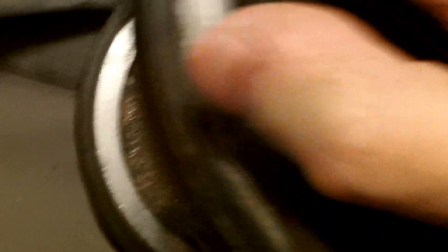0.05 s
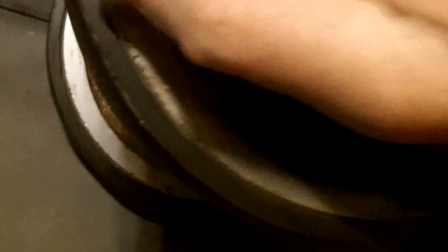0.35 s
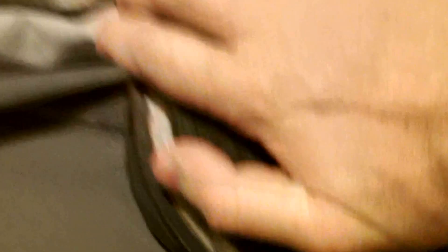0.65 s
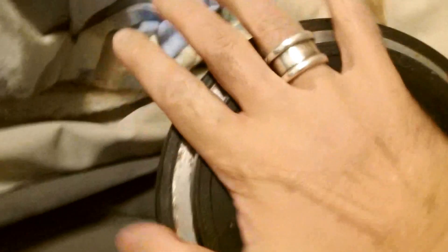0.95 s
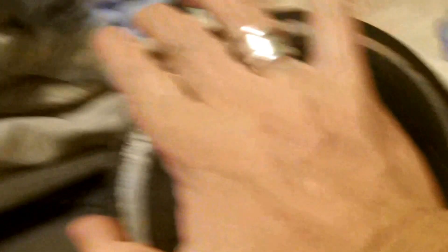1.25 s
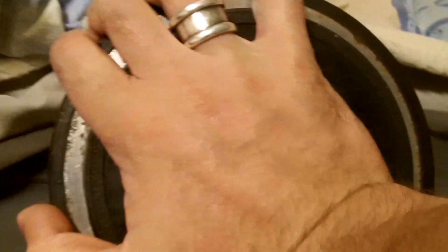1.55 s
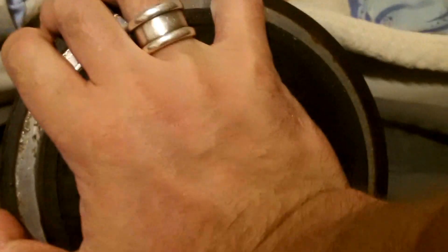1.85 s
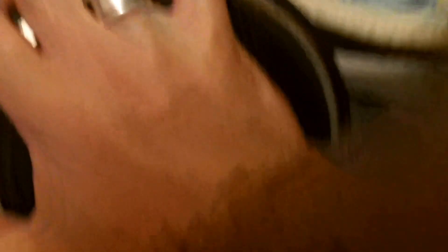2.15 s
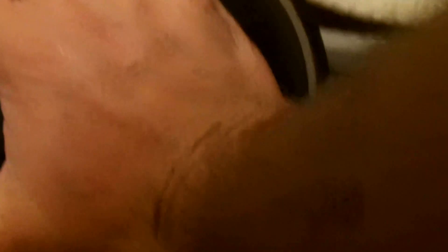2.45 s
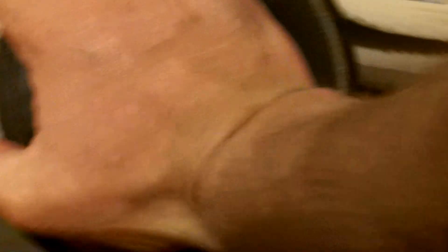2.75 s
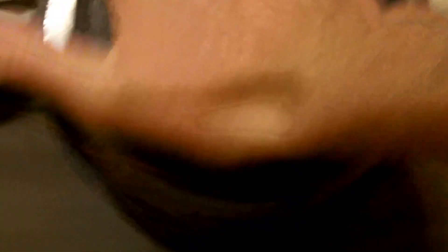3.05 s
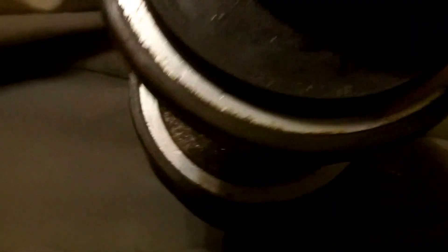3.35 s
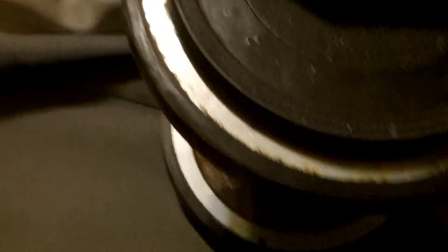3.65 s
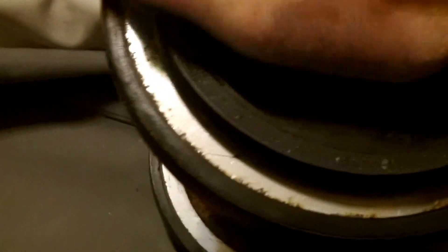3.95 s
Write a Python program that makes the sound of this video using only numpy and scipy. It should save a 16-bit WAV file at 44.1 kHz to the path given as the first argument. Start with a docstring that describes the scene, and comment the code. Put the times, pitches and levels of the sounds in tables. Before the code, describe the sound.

A mattress cover rustles twice under a dumbbell pressed by hand, then more faintly. The metal plates tick and give one sharp click midway, while skin squeaks briefly, all close and dry over handling rumble and indoor hiss.

```python
"""Two broad rubs over a mattress cover, close up, as a hand turns and presses a plate dumbbell on it.
The cloth rustles as its fibres catch and let go; lighter shifts follow, and sticking skin squeaks briefly.
Metal gives one sharp click, the plates tick and clink, and soft bumps thud into the mattress.
Handling rumble, a low drone and the hiss and hum of a quiet room lie underneath. The sound is mono."""
import sys
import numpy as np
from scipy.fft import rfft, irfft, next_fast_len
from scipy.io import wavfile
from scipy.ndimage import map_coordinates

SR = 44100
rng = np.random.default_rng(int(sys.argv[2]) if len(sys.argv) > 2 else 0)


def materialize(psi):
    """Save the field psi as 16-bit PCM at rate SR to the path in sys.argv[1].

    A 1-D psi becomes a single channel; in a 2-D psi each row is a channel.
    """
    bounded = np.clip(np.atleast_2d(psi).T, -1, 1)
    quanta = np.round(bounded * 32767).astype(np.int16)
    wavfile.write(sys.argv[1], SR, quanta)


N = 176400

# strokes over the cover
# (start [s], end [s], attack [s], release [s], level [dB], tilt [dB/octave], resonance amount [x])
RUB_STROKES = [(-.05, 0.253, .05, 0.04, -54, 0, 0.9), (0.175, 0.488, 0.048, 0.17, -39.5, 1.6, 1.66),
               (0.327, 0.615, 0.11, 0.043, -42.5, 0.8, 0.48), (0.596, 0.903, 0.11, 0.074, -49, 0, 0.99),
               (0.805, 1.186, 0.089, 0.17, -41.5, -1, 0.49), (1.737, 1.97, .09, 0.094, -52, 0.5, .4),
               (2.29, 2.55, 0.083, 0.12, -50, -3.5, 0.53), (2.548, 2.71, 0.06, 0.048, -53, 1, 0.73),
               (2.76, 3.172, .22, 0.12, -49.5, -3, 0.22), (3.143, 3.567, 0.13, 0.051, -54, 1.8, 0.37),
               (3.545, 4.08, 0.035, 0.13, -52.5, -0.8, .4)]
# base colour of the cloth (frequency [Hz], level [dB])
CLOTH_COLOUR = [(60, -17), (250, -15.5), (700, -4.5), (1350, -2.5), (2100, -2), (2800, -1), (3600, -2),
                (5200, -4.5), (6200, -7.5), (7200, -20), (9800, -17), (11500, -18.5), (14500, -37)]
# its broad resonances and one dip, scaled per stroke (centre [Hz], gain [dB], half-width [Hz])
CLOTH_RESONANCES = [(1130, 2.5, 110), (1450, -1.8, 240), (2070, 4.5, 170), (2580, 1.8, 86),
                    (3330, 1.8, 160), (3720, 3, 240), (4400, 2.5, 260)]
FIBRES_PER_S, FIBRE_SHARE = 3500, 0.31  # share of the friction's power that is crackle
WAVER_DB, WAVERS_PER_S = 1.02, 45


def rubs():
    """Countless fibres catch and let go; each rub swells, holds and fades with its own colour."""
    t, out = np.arange(N) / SR, np.zeros(N)
    lift = lambda hz: sum(db / (1 + ((hz - centre) / width) ** 2) for centre, db, width in CLOTH_RESONANCES)
    for start, end, attack, release, db, tilt, resonance in RUB_STROKES:
        fibres = unit((rng.random(N) < FIBRES_PER_S / SR) * rng.standard_normal(N))
        friction = np.sqrt(FIBRE_SHARE) * fibres + np.sqrt(1 - FIBRE_SHARE) * rng.standard_normal(N)
        colour = lambda hz: amp(along(CLOTH_COLOUR, hz) + tilt * np.log2(hz + 1) + resonance * lift(hz))
        envelope = np.clip(np.minimum((t - start) / attack, (end - t) / release), 0, 1)
        out += amp(db) * unit(filtered(friction, colour)) * envelope
    return out * amp(WAVER_DB * wobble(WAVERS_PER_S))


# squeaks of sticking skin; the first two run together
# (start [s], length [s], first pitch [Hz], middle pitch [Hz], last pitch [Hz], tone [dB], hiss [dB])
SKIN_SQUEAKS = [(0.817, .074, 2096, 1600, 1030, -48, -60), (.862, .066, 1480, 1010, 624, -58, -70),
                (2.977, 0.08, 4950, 5150, 4990, -42.5, -48.5)]
SQUEAK_JITTER, SQUEAK_HISS_WIDTH = 0.0065, 0.097  # shares of the pitch
SQUEAK_RASP, SQUEAK_HISS_FADE_S = 0.18, 0.068


def squeaks():
    """A short stick-slip tone glides with the hand's speed, inside a longer hiss at its middle pitch."""
    t, out = np.arange(N) / SR, np.zeros(N)
    for start, length, first, middle, last, db, hiss_db in SKIN_SQUEAKS:
        progress = np.clip((t - start) / length, 0, 1)
        glide = np.polyval(np.polyfit([0, .5, 1], [first, middle, last], 2), progress)
        hz = glide * (1 + SQUEAK_JITTER * wobble(400))
        phase = 2 * np.pi * np.cumsum(hz) / SR
        swell = np.sin(np.pi * progress)
        tone = np.sqrt(2) * swell ** 2 * np.sin(phase)
        rasp = wobble(800) * np.cos(phase) + wobble(800) * np.sin(phase)
        hiss_envelope = np.exp(-np.abs(t - start - length / 2) / SQUEAK_HISS_FADE_S)
        hiss = fuzzy_tone(middle, SQUEAK_HISS_WIDTH * middle) * hiss_envelope
        out += amp(db) * (tone + SQUEAK_RASP * swell * rasp) + amp(hiss_db) * hiss
    return out


# hard, bright colour of the click (frequency [Hz], level [dB])
METAL_COLOUR = [(300, -27), (900, -34), (1500, -15), (2300, -4.5), (3000, -7.5), (3850, 2.5), (4400, -5),
                (5000, -4), (5900, -22), (7500, -34), (14000, -43)]
CLICK_S, CLICK_DB = 2.2748, -18.5


def click():
    """Metal strikes the plate once, damped by hand and mattress."""
    out = np.zeros(N)
    add(out, CLICK_S, amp(CLICK_DB) * impulse(METAL_COLOUR))
    return out


# small contacts between the plates (time [s], level [dB], tilt [dB/octave])
PLATE_TICKS = [(0.2293, -26, 4), (1.1888, -34, 0), (1.4370, -40, 3), (1.4392, -34, -2), (1.633, -43, 13),
               (1.7251, -36, -3), (1.8228, -31, 2), (1.8247, -34, 3), (2.0403, -41, -1),
               (2.0540, -33.5, -4), (3.316, -35, -2), (3.6425, -37, 0), (3.7073, -43, -4), (3.732, -33, 2),
               (3.7610, -33, -2.5), (3.8013, -32, 0), (3.8035, -31, 2.5), (3.8069, -32, -1),
               (3.81, -36, -4), (3.813, -28, -2)]
# their base colour (frequency [Hz], level [dB])
PLATE_COLOUR = [(200, -15), (900, -6.5), (2000, 1), (4000, 1), (5500, -7), (7500, -37), (14000, -45)]
TICK_TAIL_GAIN, TICK_T60_S = .1, .014


def ticks():
    """The shifting plates touch: each damped tick is a snap with a tiny scraping tail."""
    t, out = np.arange(SR // 20) / SR, np.zeros(N)
    for time, db, tilt in PLATE_TICKS:
        snap = t == 0
        tail = TICK_TAIL_GAIN * rng.standard_normal(len(t)) * amp(-60 * t / TICK_T60_S)
        colour = [(hz, colour_db + tilt * np.log2(hz)) for hz, colour_db in PLATE_COLOUR]
        add(out, time, amp(db) * np.convolve(snap + tail, impulse(colour)))
    return out


# ring of the loose plate (frequency [Hz], level [dB], t60 [s])
PLATE_MODES = [(2820, 0, .055), (3190, -4, .04)]
CLINK_S, CLINK_DB = 3.315, -41.5


def clink():
    """The loose plate rings faintly, choked by hand and mattress."""
    out = np.zeros(N)
    add(out, CLINK_S, amp(CLINK_DB) * ring(PLATE_MODES, attack_s=0.0026))
    return out


# soft bumps, ahead of the muffling (time [s], knock level [dB], knock pitch [Hz], thud level [dB])
SOFT_BUMPS = [(0.0765, -35, 850, -42.5), (0.3282, -35, 600, -40.5), (.3822, -26, 960, -59),
              (.399, -35.5, 242, -40), (.705, -39, 1010, -52), (2.3496, -31, 734, -41.5),
              (3.585, -39.5, 750, -68)]
# low body of the mattress (frequency [Hz], level [dB], t60 [s])
MATTRESS_MODES = [(73, -1.5, 0.096), (150, -4, 0.056)]
KNOCK_T60_CYCLES, MUFFLE_HZ = 5.6, 1160


def bumps():
    """Padded knocks die within a few cycles, each with a low thud from the mattress."""
    out = np.zeros(N)
    thud = ring(MATTRESS_MODES, attack_s=0.0022)
    for time, db, hz, thud_db in SOFT_BUMPS:
        knock = ring([(hz, 0, KNOCK_T60_CYCLES / hz)], attack_s=.0003)
        add(out, time, amp(db) * knock + amp(thud_db) * thud)
    return filtered(out, lambda hz: 1 / (1 + (hz / MUFFLE_HZ) ** 10))


# fader ride of the handling rumble (time [s], level [dB])
RUMBLE_RIDE = [(0, -53), (.33, -50), (.55, -48), (.9, -58), (1.5, -60.5), (1.95, -61), (2.4, -49.5),
               (2.75, -53), (3.15, -56.5), (3.4, -60), (4, -57)]
# its sub-heavy colour (frequency [Hz], level [dB])
RUMBLE_COLOUR = [(3, -11), (8, 1), (16, -2.5), (30, -16.5), (55, -24), (120, -25), (300, -32), (900, -48)]


def rumble():
    """Handling makes slow pressure swings."""
    return noise(RUMBLE_COLOUR) * fader(RUMBLE_RIDE)


# fader ride of the drone (time [s], level [dB])
DRONE_RIDE = [(0, -57.5), (.7, -75), (1.9, -74), (2.28, -72), (2.4, -56.5), (2.62, -63), (2.9, -75),
              (3.4, -70), (3.8, -63), (4, -62)]


def drone():
    """A low drone near the pitch of the mattress comes and goes."""
    return fuzzy_tone(hz=76.4, half_width_hz=6.5) * fader(DRONE_RIDE)


# colour of the hiss (frequency [Hz], level [dB])
HISS_COLOUR = [(25, 6), (100, -1.5), (300, 2), (750, 1), (2000, 1), (3200, 0), (5000, -1.5), (6400, -7.5),
               (7400, -12.5), (9200, -9.5), (11000, -7), (15000, -8)]
# bands of room hum (centre [Hz], level [dB], half-width [Hz])
HUM_BANDS = [(159.8, -73, 8.8), (298.4, -72, 12.5), (709, -70.5, 19)]
HISS_DB = -49


def room_tone():
    """A bed of steady hiss and faint, fuzzy room hum."""
    hiss = amp(HISS_DB) * noise(HISS_COLOUR)
    hum = sum(amp(db) * fuzzy_tone(hz, width) for hz, db, width in HUM_BANDS)
    return hiss + hum


def amp(db):
    """Decibels to gain."""
    return 10 ** (np.asarray(db) / 20)


def unit(x):
    """Scale to rms 1."""
    return x / np.sqrt(np.mean(x ** 2) + 1e-20)


def along(points, hz):
    """Read (frequency [Hz], level [dB]) points on a log frequency axis."""
    frequencies, levels = np.transpose(points)
    return np.interp(np.log(hz + 1), np.log(frequencies + 1), levels)


def fader(points):
    """Gain per sample from (time [s], level [dB]) points."""
    return amp(np.interp(np.arange(N) / SR, *np.transpose(points)))


def wobble(rate):
    """A smooth random curve with rate knots a second."""
    return map_coordinates(rng.standard_normal(int(N * rate / SR) + 4), [np.arange(N) * rate / SR])


def filtered(x, response):
    """Apply a gain that depends on frequency."""
    size = next_fast_len(N + SR // 2)
    return irfft(rfft(x, size) * response(np.fft.rfftfreq(size, 1 / SR)), size)[:N]


def noise(colour):
    """Coloured noise of rms 1."""
    return unit(filtered(rng.standard_normal(N), lambda hz: amp(along(colour, hz))))


def fuzzy_tone(hz, half_width_hz):
    """A narrow band of noise, rms 1."""
    return unit(filtered(rng.standard_normal(N), lambda f: 1 / (1 + ((f - hz) / half_width_hz) ** 2)))


def impulse(colour, size=512):
    """A minimum-phase pulse of the given colour, peak 1."""
    cepstrum = irfft(np.log(amp(along(colour, np.fft.rfftfreq(size, 1 / SR)))))
    causal = 2 * cepstrum[:size // 2] * (np.arange(size // 2) > 0)
    pulse = irfft(np.exp(rfft(causal, size)))
    return pulse / np.abs(pulse).max()


def ring(modes, attack_s):
    """Damped modes after one blow, peak 1."""
    t = np.arange(SR // 10) / SR
    tone = sum(amp(db - 60 * t / t60) * np.sin(2 * np.pi * hz * t) for hz, db, t60 in modes)
    tone *= 1 - np.exp(-(t / attack_s) ** 2)
    return tone / np.abs(tone).max()


def add(out, start_s, sound):
    """Mix a sound in at start_s."""
    part = out[max(round(start_s * SR), 0):][:len(sound)]
    part += sound[:len(part)]


def scene():
    """Everything is close and dry, the same in both channels."""
    mono = rubs() + squeaks() + click() + ticks() + clink() + bumps() + rumble() + drone() + room_tone()
    return np.array([mono, mono])


NOTCH_HZ, NOTCH_WIDTH_HZ, TOP_HZ = 7884, 520, 15300


def record(dry):
    """The recorder has a deep notch in the treble and a steep band limit."""
    response = lambda hz: (1 - np.exp(-((hz - NOTCH_HZ) / NOTCH_WIDTH_HZ) ** 2)) * (hz < TOP_HZ)
    return np.array([filtered(channel, response) for channel in dry])


dry = scene()
out = record(dry)
materialize(out)
```